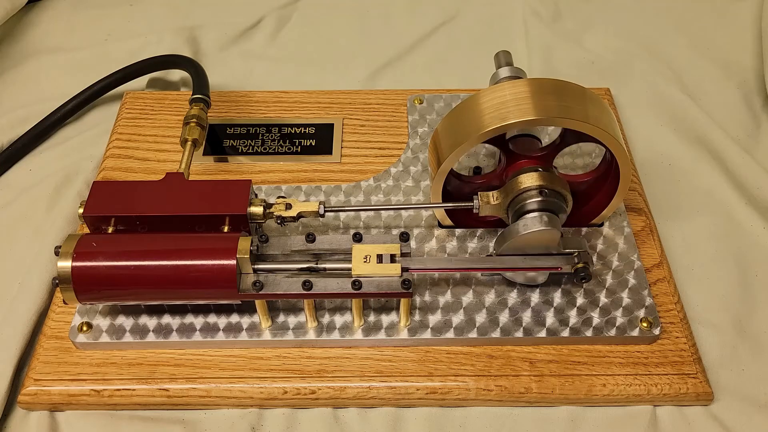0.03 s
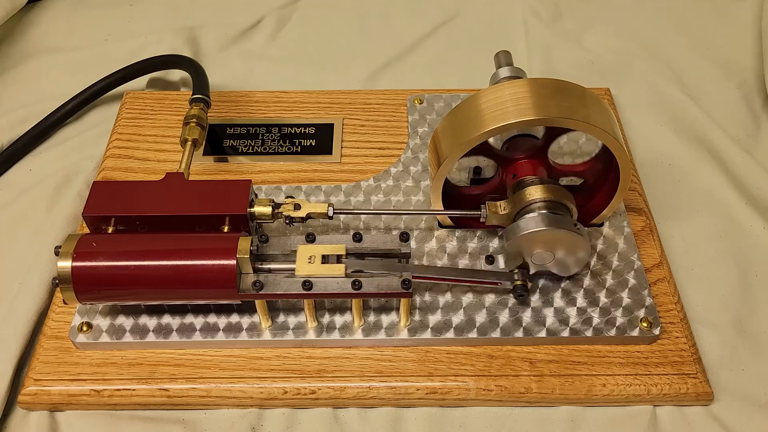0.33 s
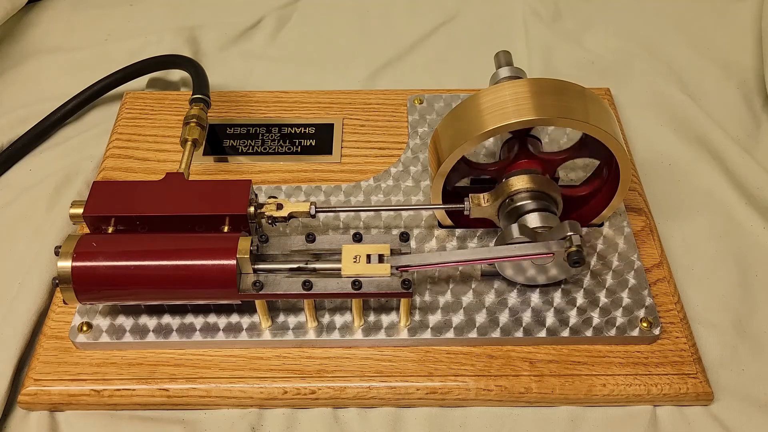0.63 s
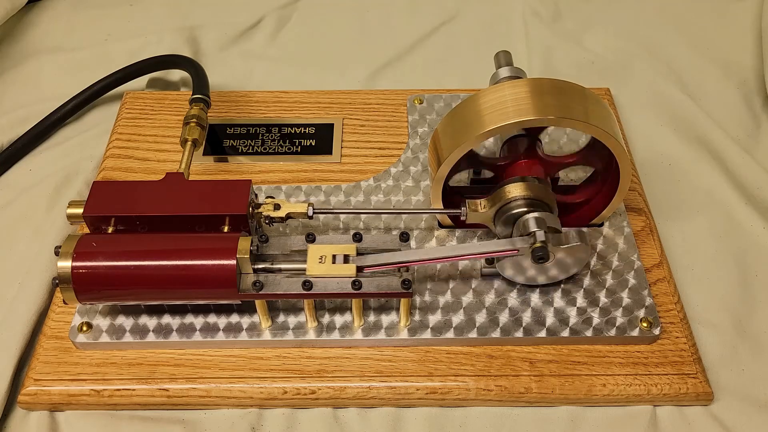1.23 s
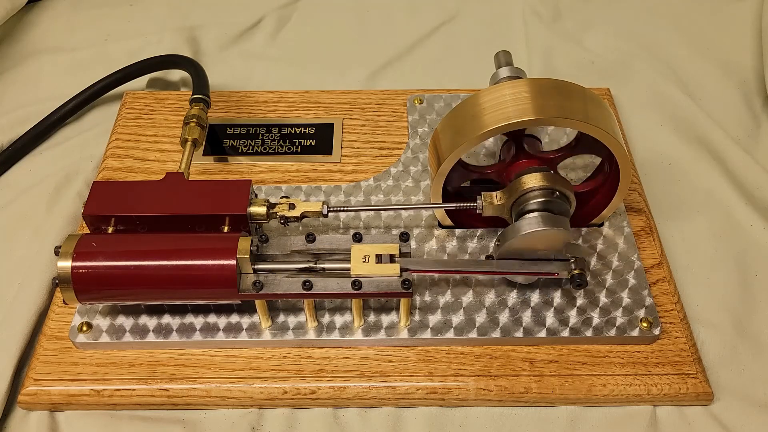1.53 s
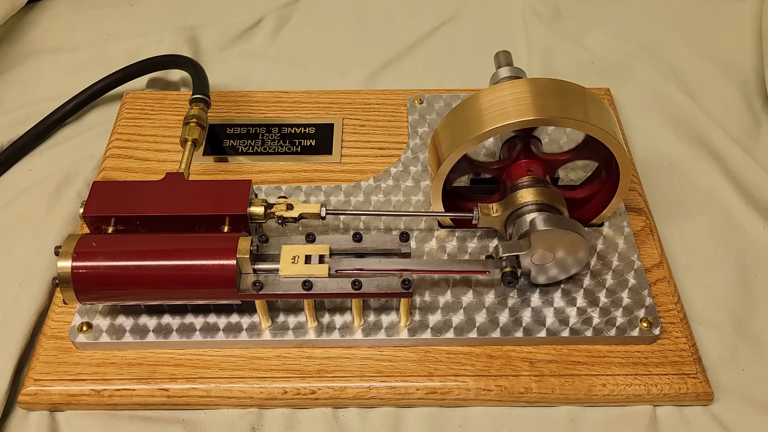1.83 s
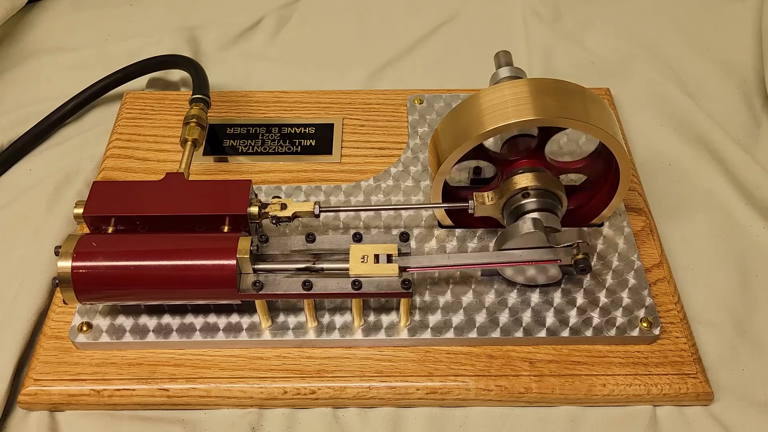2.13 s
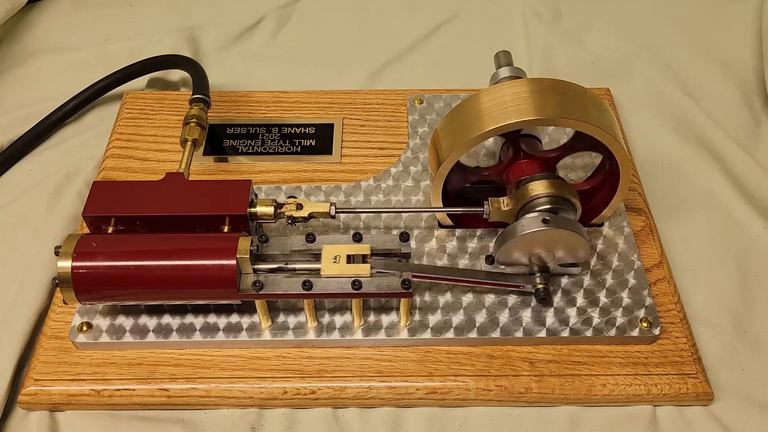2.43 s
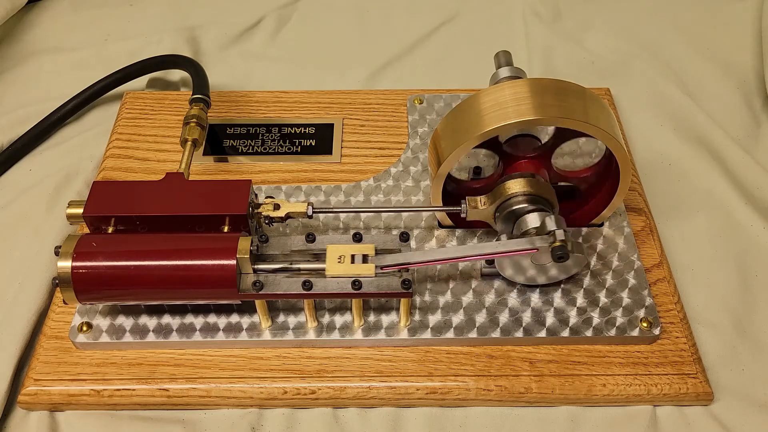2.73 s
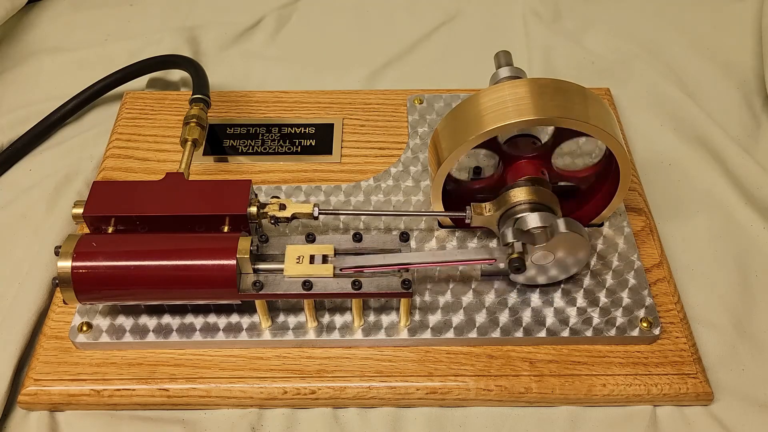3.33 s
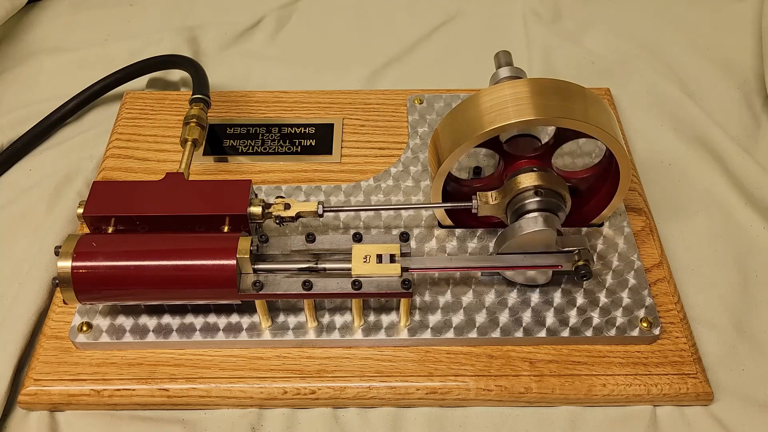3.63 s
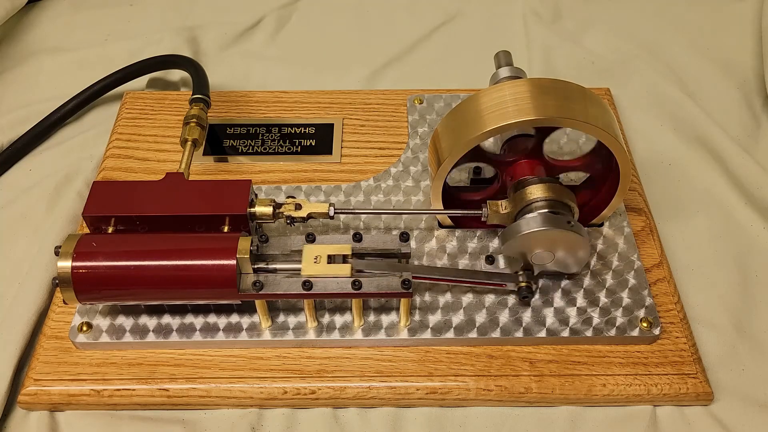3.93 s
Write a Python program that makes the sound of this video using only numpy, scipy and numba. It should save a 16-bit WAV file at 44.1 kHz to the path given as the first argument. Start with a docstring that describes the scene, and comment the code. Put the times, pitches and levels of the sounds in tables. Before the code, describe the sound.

Steady, rhythmic puffing comes from an air-driven model engine, heard up close indoors. Sharp bursts alternate with rising hisses that stop abruptly, while a loose bearing knocks lightly and the wooden base thumps softly.

```python
"""A model mill engine runs on compressed air at about 83 rpm, close by in a small room.
Each turn: a tick at dead centre and a sharp puff, a thin leak, then a second exhaust that swells, rises
in pitch and is cut off by the valve; a loose bearing knocks and the wooden base thumps. The flywheel
rumbles. Air is shaped noise under flow envelopes; impacts are decaying modes."""
import sys
import numpy as np
from scipy import signal
from scipy.fft import rfft, irfft
from scipy.io import wavfile
from scipy.ndimage import uniform_filter1d
from numba import njit

SR = 44100
rng = np.random.default_rng(int(sys.argv[2]) if len(sys.argv) > 2 else 0)


def digitize_waveform(pressure):
    """Quantize a signal to 16-bit integers and store it at the path in sys.argv[1].

    Rows of a 2-D input are taken as channels; values are limited to [-1, 1].
    """
    field = np.atleast_2d(pressure).T
    bounded = np.clip(field, -1, 1)
    quanta = np.round(bounded * 32767).astype(np.int16)
    wavfile.write(sys.argv[1], SR, quanta)


N = 176400

# crank turns (dead centre [s], tick [dB], puff [dB], delay to valve cut-off [s])
CRANK_TURNS = [(-.388, -40, 1.5, 0.42), (0.338, -42.5, 0.5, 0.42), (1.058, -43, 0.6, .42),
               (1.777, -42.5, 1, 0.42), (2.502, -43.5, 0.5, 0.4226), (3.224, -43.5, -0.5, .422),
               (3.953, -43, 1, .425)]


def exhaust(centres, cuts):
    """Raspy puff on the first stroke, slow swell on the second; both shake the base."""
    # noise spectra (frequency [Hz], level [dB])
    puff_spectrum = [(300, -25), (700, -13), (1000, -16.5), (1550, -13), (1950, -7), (2300, -8.5),
                     (3400, -2), (4100, -0.5), (5200, -2.5), (6200, -5.5), (7700, .3), (9600, 2.5),
                     (10800, -5), (12000, -6), (13500, -1), (14700, -0.5), (15800, -3)]
    swell_spectrum = [(1500, -38), (2000, -17.5), (2900, -14.5), (3400, -10), (4200, -9), (6100, -6.5),
                      (6700, -4.5), (7700, -1), (9500, 1), (10000, 1), (10700, -7), (12500, -6),
                      (14900, -5), (15800, -14)]
    port_spectrum = [(1400, -20.5), (2000, -5), (2600, -8), (3100, -2.5), (3600, 0), (4300, -2),
                     (5500, -12), (9000, -25)]  # lower roar of the wide-open port
    jet_spectrum = [(3000, -16), (4800, 0), (5800, -3), (7500, -8), (11000, -13), (15000, -20)]
    rasp_spectrum = [(500, -13), (1500, 0.5), (3800, -4), (6000, -16), (15000, -20)]
    base_spectrum = [(130, -6.5), (168, 7), (230, -14.5), (320, -11.5), (450, -23), (1500, -55)]
    spits_per_s = 420
    jet = undb(-39.5) * air(jet_spectrum) * stroke(centres, 0.0046, 0.0085, 0.047, 0.018)
    spits = (rng.random(N) < spits_per_s / SR) * rng.standard_normal((2, N))
    rasp = undb(-48) * unit(irfft(rfft(spits) * shape(rasp_spectrum), N))
    rasp *= stroke(centres, 0.027, 0.022, 0.066, 0.018)
    puff = undb(-32.5) * air(puff_spectrum) * stroke(centres, 0.0004, 0.023, 0.067, 0.026, db_per_s=20)
    swell = undb(-35) * air(swell_spectrum) * stroke(cuts, -0.23, 0.25, 0.0011, 0.01, db_per_s=14)
    port = undb(-44.5) * air(port_spectrum) * stroke(cuts, -0.22, 0.18, -0.023, 0.024)
    shake = undb(-57) * stroke(centres, 0, 0.056, 0.07, 0.034)
    shake += undb(-58.5) * stroke(cuts, -0.042, 0.047, 0.022, 0.02)
    return puff + jet + rasp + swell + port + shake * air(base_spectrum)


def cylinder(cuts):
    """The shortening air column whistles upward, breaks at the valve and spits once more."""
    # air column (time after dead centre [s], resonance [Hz])
    cavity_sweep = [(.28, 3100), (.36, 3830), (.405, 5070), (.432, 5400), (.452, 6650), (.475, 8270),
                    (.51, 9100)]
    width_hz = 2600.0
    t = np.arange(N) / SR
    centres_s = np.array(CRANK_TURNS)[:, 0]
    since_s = t - centres_s[np.searchsorted(centres_s, t) - 1]
    hz = np.interp(since_s, *np.array(cavity_sweep).T)
    noise = air([(1000, 0), (15000, 0)])
    whistle = unit(np.array([bandpass(bandpass(x, hz, width_hz), hz, width_hz) for x in noise]))
    flow = undb(-41) * stroke(cuts, -0.079, 0.074, 0.004, 0.016)
    flow += undb(-49.5) * stroke(cuts, 0.025, 0.014, 0.055, 0.023)
    spit = undb(-48.5) * air([(2500, -7), (5000, -6.5), (9000, -7), (11500, -1), (15500, 0)])
    spit *= stroke(cuts, 0.016, 0.014, 0.048, 0.047)
    return whistle * flow + spit


def leaks(centres):
    """Thin hiss past valve and gland under pressure, over a constant seep."""
    # noise spectra (frequency [Hz], level [dB])
    valve_spectrum = [(380, -13), (500, -12), (750, -11.5), (1050, -11), (1780, -10.5), (2260, -12.5),
                      (2900, -7.5), (3620, -12.5), (4800, -12), (6300, -14), (8320, -3), (9700, -7.5),
                      (10600, -16.5), (12000, -8.5), (14700, -10), (15800, -4.5)]
    seep_spectrum = [(330, -9.5), (600, -8.5), (850, -14), (1060, -4.5), (1390, -9), (1810, -8), (2940, -8),
                     (3600, -9), (6090, -11.5), (7620, -14.5), (9720, -12.5), (11500, -18.5), (14700, -6.5),
                     (15800, -6)]
    back_spectrum = [(1500, 2), (3000, 1.5), (6500, -5.5), (9300, 4.5), (11300, -4.5), (15000, 9.5)]
    valve = undb(-47.5) * air(valve_spectrum) * stroke(centres, -0.021, 0.015, 0.41, 0.054, db_per_s=-6.5)
    gland = undb(-46.5) * air([(12500, -18.5), (14300, -2.5), (15200, 1), (15800, -8.5)], left_db=1)
    gland *= stroke(centres, 0.017, 0.043, 0.25, 0.08, db_per_s=-13)
    crack = undb(-49) * air([(5500, -11), (8000, 15), (10000, -14), (11500, -9), (15000, -9.5)])
    crack *= stroke(centres, -0.02, 0.024, -0.0029, 0.0069)
    backstroke = undb(-51) * air(back_spectrum, left_db=-0.5) * stroke(centres, 0.541, 0.091, 0.69, 0.11)
    seep = undb(-56) * air(seep_spectrum, left_db=1)
    return valve + gland + crack + backstroke + seep


def linkage():
    """Play in the rod: a tick at one dead centre; at the other a tap, a falling knock and a thump."""
    # return-stroke bearing knocks (time [s], knock [dB], thump [dB], tap [dB])
    bearing_knocks = [(.091, -34.2, -50, -52), (.817, -44, -41.5, -54), (1.538, -39, -41.5, -54.5),
                      (2.26, -43, -41, -52.5), (2.982, -45.5, -42, -56.5), (3.712, -52, -43.5, -58)]
    # modes of tick, metal bed and wooden base (frequency [Hz], level [dB], t60 [s])
    tick_modes = [(780, -6.5, 0.056), (1034, -4, 0.082), (1510, 0, 0.035), (1710, 2.5, 0.013),
                  (2260, -1.5, 0.039), (2540, -5.5, 0.06), (2890, -3, 0.04), (3840, 6, 0.0089)]
    bed_modes = [(563, -0.5, 0.072), (654.3, -1, 0.087), (695, -5, 0.17), (920, -14.5, 0.12),
                 (1013, -7.5, 0.077), (1157, -12, 0.07), (1274, -3, 0.032)]
    base_modes = [(67.7, -13.5, 0.2), (167.5, -2, 0.14), (227, -10, 0.054), (316.4, -11.5, .13),
                  (379, -12, .05)]
    start_hz, end_hz, fall_s, decay_s = 1483, 530, 0.00394, 0.0068
    tap_lead_s, thump_lag_s = 0.023, 0.00916
    out, t = np.zeros(N), np.arange(SR // 2) / SR
    for start_s, tick_db, _, _ in CRANK_TURNS:
        add(out, start_s, undb(tick_db) * ring(tick_modes, t) * onset(t, 0.00027))
    hz = end_hz + (start_hz - end_hz) * np.exp(-t / fall_s)
    chirp = np.sin(2 * np.pi * np.cumsum(hz) / SR) * np.exp(-t / decay_s) * onset(t, 0.006)
    for start_s, knock_db, thump_db, tap_db in bearing_knocks:
        bed = ring(bed_modes, t) * onset(t, 0.00071)
        add(out, start_s, undb(knock_db) * (undb(4.5) * chirp + undb(-4) * bed))
        add(out, start_s + thump_lag_s, undb(thump_db) * ring(base_modes, t) * onset(t, 0.0056))
        add(out, start_s - tap_lead_s, undb(tap_db) * ring(tick_modes[:4], t))
    return out


def crosshead(centres):
    """Faint rub in the guide on the return stroke."""
    rub = air([(800, -25), (1080, 7), (1300, -4), (2200, -32), (6000, -49)], left_db=1)
    return undb(-57) * rub * stroke(centres, 0.595, 0.018, 0.608, 0.014)


def flywheel():
    """Wavering rumble through the base."""
    # (frequency [Hz], level [dB])
    rumble_spectrum = [(20, -14), (35, -2.5), (48, -4.5), (58, -0.5), (68, 4), (80, -8), (98, -15),
                       (115, -12), (135, -19), (168, -13), (200, -18), (255, -30), (315, -15), (430, -23.5),
                       (700, -19), (2000, -52)]
    return undb(-57.5) * air(rumble_spectrum) * undb(drift(12))


def scatter(x, level_db=-8.5, t60_s=0.07):
    """Close reflections off plate and flywheel comb the hiss, differently on each side."""
    t = np.arange(SR // 20) / SR
    paths = rng.standard_normal((2, len(t))) * decay(t, t60_s)
    paths *= undb(level_db) / np.sqrt(np.sum(paths ** 2) / 2)
    return (x + signal.fftconvolve(x, paths, axes=1)[:, :N]) / np.hypot(1, undb(level_db))


def room(x, tail_db=-2, t60_s=0.17, echo_s=0.014, echo_db=-17):
    """One early reflection and a short diffuse stereo tail."""
    t = np.arange(SR // 2) / SR
    tail = rng.standard_normal((2, len(t))) * decay(t, t60_s) * (t > 0.002)
    tail *= undb(tail_db) / np.sqrt(np.sum(tail ** 2) / 2)
    tail[:, int(echo_s * SR)] += undb(echo_db)
    return x + signal.fftconvolve(x[None], tail, axes=1)[:, :N]


def air(spectrum, left_db=0):
    """Turbulent stereo noise from (frequency [Hz], level [dB]) points, rms 1 before panning."""
    # narrow resonances colouring the noise (frequency [Hz], width [Hz], gain [dB])
    resonances = [(2962, 200, 5.5), (3380, 100, 6), (3810, 70, 3), (4090, 56, 6.5), (4780, 100, -0.5),
                  (4900, 67, 5), (5140, 100, -4), (5400, 37, 2), (5750, 61, 4), (6120, 270, 1.5),
                  (6590, 65, 6), (6900, 150, 1), (7480, 100, 3), (8030, 120, 5.5), (8300, 66, 0),
                  (9200, 90, 2.5), (9430, 49, -0.5), (9790, 160, 4), (10250, 57, 6), (11000, 130, 3),
                  (13100, 76, 2), (14550, 82, -14)]
    # stereo width (frequency [Hz], side gain [dB])
    side_spectrum = [(30, -21), (70, -10), (160, -4.5), (300, -2), (600, 0.5), (1200, 1), (2200, 3),
                     (2950, 0), (3700, 1.5), (4700, 2), (5500, 3), (6000, -1.5), (7000, 0.5), (8000, -3.5),
                     (9700, -2), (11000, 1.5), (12600, 1.5), (15000, 1)]
    lag_s, likeness = 0.00013, 0.99  # the air reaches the left side first
    f = np.arange(N // 2 + 1) * SR / N
    colour_db = sum(db / (1 + (2 * (f - hz) / width_hz) ** 2) for hz, width_hz, db in resonances)
    mid, other = rfft(rng.standard_normal((2, N))) * shape(spectrum) * undb(colour_db)
    coherent = likeness * np.sin(2 * np.pi * f * lag_s)
    side = (1j * coherent * mid + np.sqrt(1 - coherent ** 2) * other) * shape(side_spectrum)
    pan = undb(np.array([[left_db], [-left_db]]) / 2)
    return unit(irfft(np.array([mid + side, mid - side]), N)) * pan


def stroke(marks, open_s, attack_s, close_s, release_s, db_per_s=0):
    """Flow envelope around each mark (time [s], level [dB]): smooth rise, slope, exponential release."""
    out = 0
    for mark_s, db in marks:
        t = np.arange(N) / SR - mark_s
        rise = np.sin(np.pi / 2 * np.clip((t - open_s) / attack_s, 0, 1)) ** 2
        level = undb(db + db_per_s * (np.clip(t, open_s, close_s) - close_s))
        out += rise * level * np.exp(-np.maximum(t - close_s, 0) / release_s)
    return out


def ring(modes, t, detune=0.0057):
    """Decaying modes, slightly different at each blow."""
    out = 0
    for hz, db, t60_s in modes:
        hz *= 1 + detune * rng.standard_normal()
        out += undb(db) * np.sin(2 * np.pi * hz * t + rng.uniform(0, 2 * np.pi)) * decay(t, t60_s)
    return out


@njit
def bandpass(x, hz, width_hz):
    """State-variable resonator with a moving centre."""
    y, band, low = np.empty(len(x)), 0., 0.
    for i in range(len(x)):
        g, damping = np.tan(np.pi * hz[i] / SR), width_hz / hz[i]
        v = (band + g * (x[i] - low)) / (1 + g * (g + damping))
        band, low, y[i] = 2 * v - band, low + 2 * g * v, damping * v
    return y


def shape(spectrum):
    """Gain per FFT bin; falls 12 dB/octave below the first point."""
    hz, db = np.array(spectrum, float).T
    f = np.arange(N // 2 + 1) * SR / N + 1e-3
    return undb(np.interp(np.log(f), np.log(hz), db)) * np.minimum(f / hz[0], 1) ** 2


def drift(rate_hz):
    """Smoothed random steps."""
    hold = int(SR / rate_hz)
    steps = np.repeat(rng.standard_normal(N // hold + 1), hold)
    return 2 * uniform_filter1d(uniform_filter1d(steps, hold), hold)[:N]


def onset(t, rise_s):
    return 1 - np.exp(-t / rise_s)


def decay(t, t60_s):
    return np.exp(-np.log(1000) * t / t60_s)


def undb(db):
    return 10 ** (np.asarray(db) / 20)


def unit(x):
    return x / np.sqrt(np.mean(x ** 2))


def add(out, start_s, sound):
    i = int(start_s * SR)
    if 0 <= i < N:
        out[i:i + len(sound)] += sound[:N - i]


def scene():
    """Fluttering air, linkage, crosshead and flywheel."""
    centres = [(centre_s, puff_db) for centre_s, _, puff_db, _ in CRANK_TURNS]
    cuts = [(centre_s + delay_s, 0) for centre_s, _, _, delay_s in CRANK_TURNS]
    hiss = exhaust(centres, cuts) + cylinder(cuts) + leaks(centres)
    flutter_db = 0.55 * drift(150) + 0.86 * drift(8.77)
    rumble = flywheel()
    return scatter(hiss * undb(flutter_db)) + room(linkage()) + crosshead(centres) + rumble


def record(dry):
    """Steep low-pass."""
    top_hz = 15850
    return signal.sosfilt(signal.ellip(12, 0.1, 80, top_hz, fs=SR, output="sos"), dry)


dry = scene()
out = record(dry)
digitize_waveform(out)
```